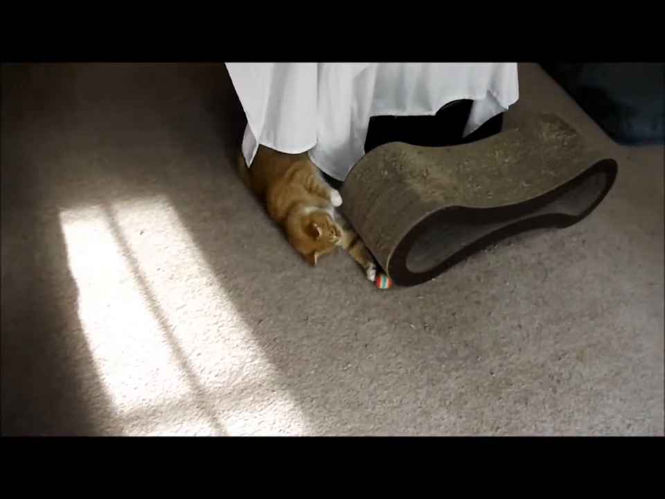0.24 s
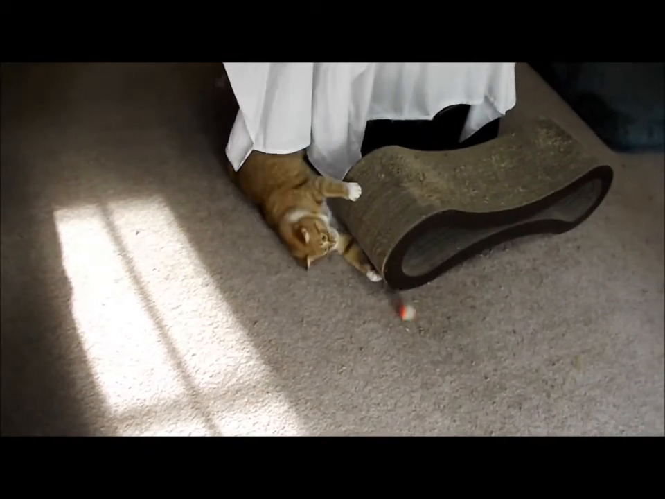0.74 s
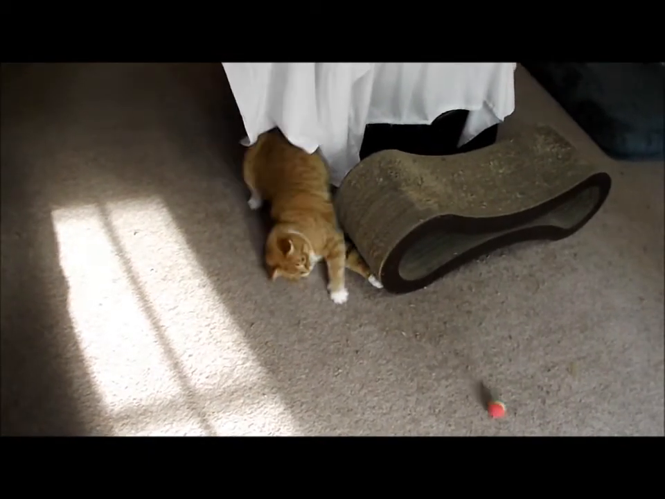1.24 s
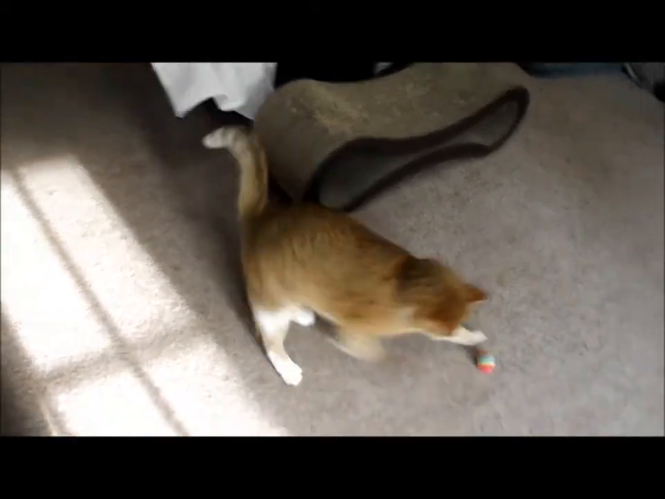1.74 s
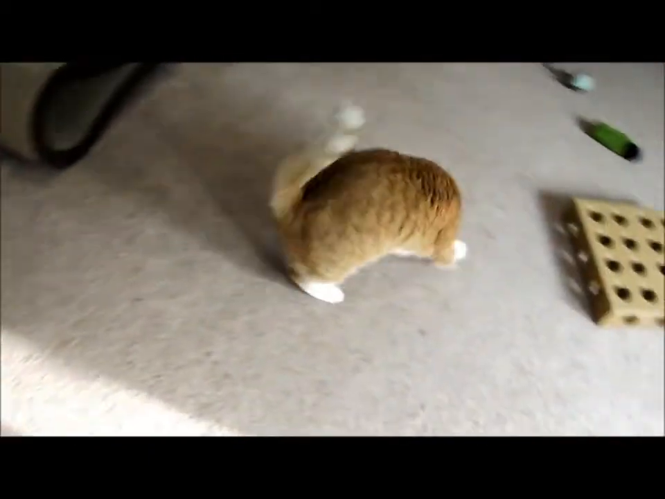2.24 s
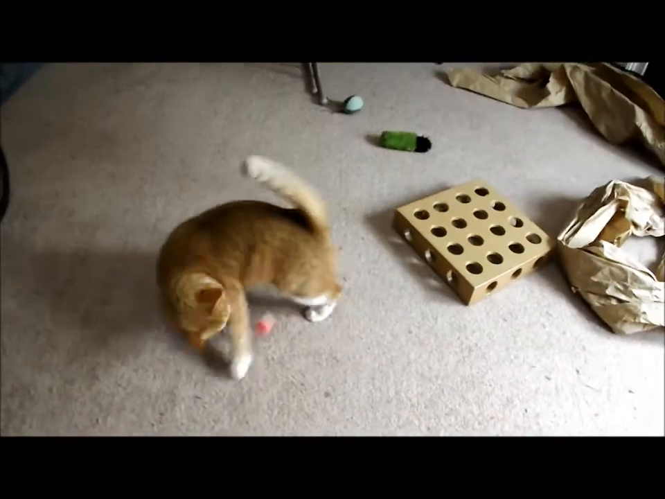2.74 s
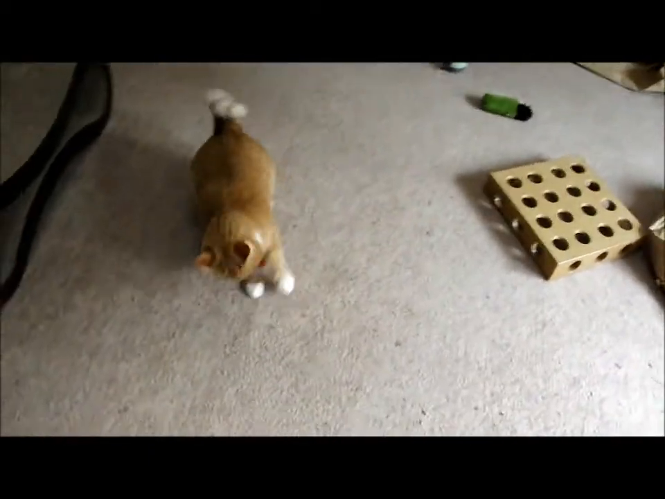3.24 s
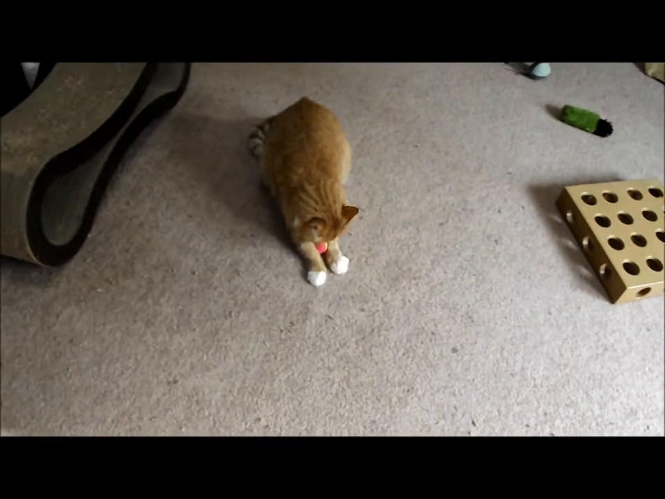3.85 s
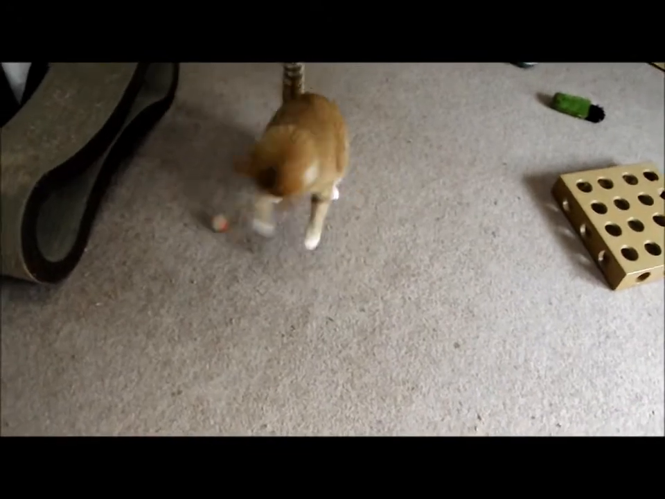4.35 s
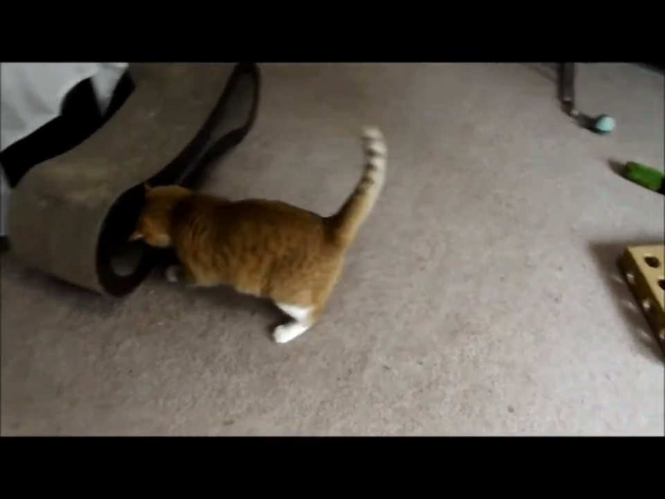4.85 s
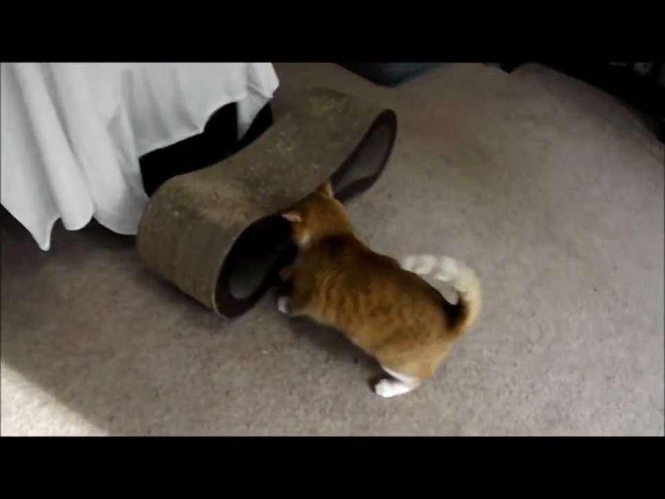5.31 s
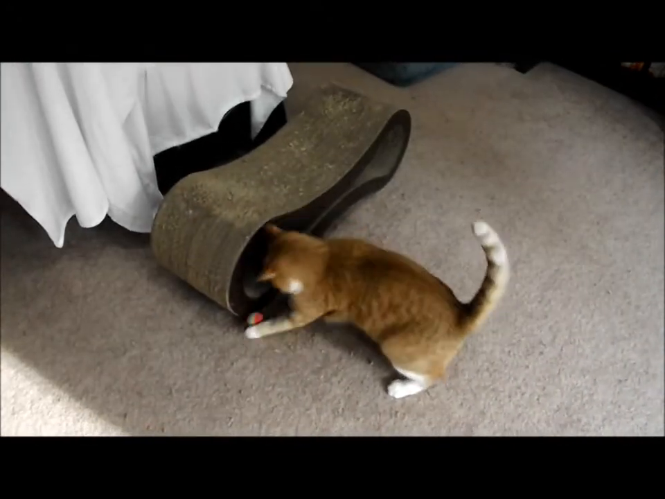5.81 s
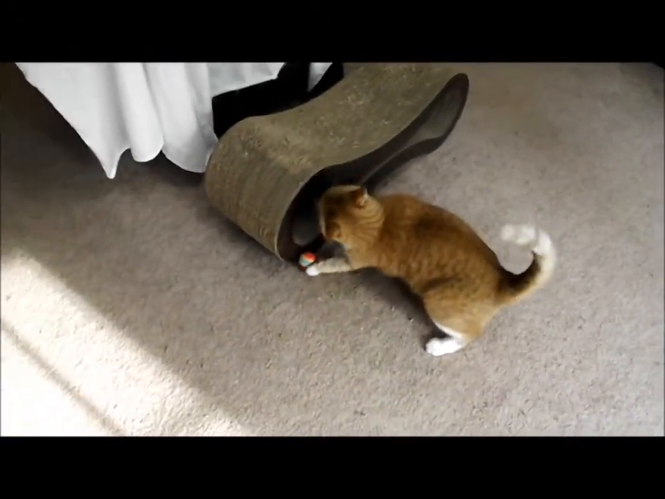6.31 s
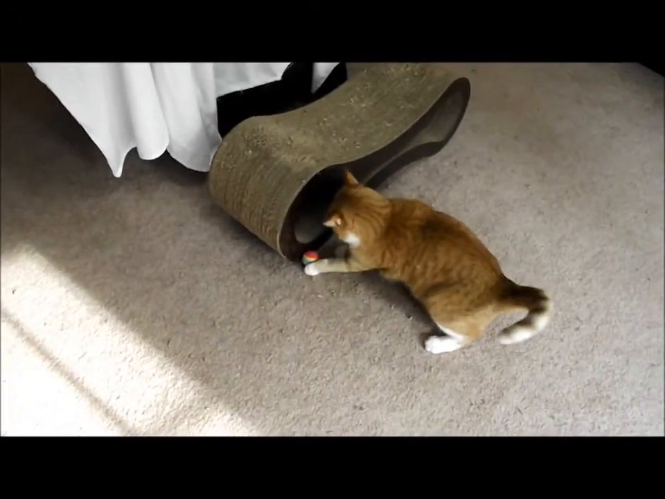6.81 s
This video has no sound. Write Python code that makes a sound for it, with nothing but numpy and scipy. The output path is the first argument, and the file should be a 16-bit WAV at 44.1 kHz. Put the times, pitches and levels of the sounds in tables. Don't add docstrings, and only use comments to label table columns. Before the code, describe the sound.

A quiet carpeted room holds a low drone, a faint motor and fan hum and soft airy noise throughout. From 0 to 0.7 s a small hard ball clicks lightly under a cat's paw. At 0.77 s comes the loudest sharp crack with a tight rattle, and at 1.22 s another bright click with chattering bounces. A firm paw thump at 1.45 s starts a scramble until about 3.2 s: dull quick footfalls, low floor rumble, rustling fur and pile, brief claw squeaks, and strong clicks near 2.7 and 2.95 s. It then calms; five short plastic creaks of the handheld camera shell come between 3.7 and 4.15 s. Hollow cardboard knocks follow at 4.45-4.7, 5.25 and, strongest with a sharp click, 5.7 s. A small rattle at 6.43 s and a boxy knock at 6.75 s close before the hum remains to 7 s.

```python
import sys
import numpy as np
from scipy import signal
from scipy.fft import rfft, irfft
from scipy.io import wavfile
from scipy.ndimage import uniform_filter1d

SR = 44100
rng = np.random.default_rng(int(sys.argv[2]) if len(sys.argv) > 2 else 0)


def ratio(d):
    e = np.asarray(d, float) / 20
    return 10 ** e


def digitize_waveform(pressure):
    field = np.atleast_2d(pressure).T
    bounded = np.clip(field, -1, 1)
    quanta = np.round(bounded * 32767).astype(np.int16)
    wavfile.write(sys.argv[1], SR, quanta)


N = 311787

# (frequency [Hz], density [dB per Hz])
AIR_SPECTRUM = [(76, -7), (130, -2), (166, -5), (285, -22), (386, -11), (613, -17), (1370, -8.5),
                (1550, -22.5), (2090, -11.5), (2410, -20), (3390, -9.5), (3910, -14.5), (5620, -23.5),
                (13600, -30), (15700, -45)]
AIR_DB = -47.5
# (frequency [Hz], width [Hz], level over noise [dB])
AIR_RESONANCES = [(385, 8, -8), (1145, 120, 4), (1416, 72, 10), (1700, 166, 12), (2128, 43, 9.5),
                  (2606, 270, 9), (3060, 50, 5), (3336, 45, 13), (3435, 130, 9), (3624, 114, 9),
                  (4310, 167, 13), (5000, 140, 5)]
# (frequency [Hz], t60 [s])
ROOM_T60 = [(150, 0.5), (400, 0.37), (1040, 0.25), (2760, 0.54), (7280, 0.41)]
# (frequency [Hz], density [dB per Hz])
PORT_HISS = [(500, -95), (2000, -87), (4000, 33), (8000, 12), (16000, 2.5)]
# (frequency [Hz], density [dB per Hz])
DRONE_SPECTRUM = [(2, -25), (5, 9), (20, 5), (38, 0), (52, 5.5), (66, -2.5), (74, -9), (82, -4.5),
                  (100, -20), (140, -45), (190, -41)]
DRONE_DB = -42.5
MOTOR_HZ, MOTOR_DB = 119.5, -54.5
# (time [s], level [dB])
FAN_LEVEL = [(0, -67.5), (1.3, -63), (3.3, -70.5), (4.9, -66.5), (5.4, -64), (7.07, -63)]
FAN_HZ = 382.5
# (time [s], rustle [dB], rumble [dB])
MOTION_LEVELS = [(0.0, -34.5, -47), (0.25, -51, -56.5), (0.69, -39.5, -54), (0.81, -36, -53),
                 (1.0, -42.5, -52), (1.45, -41, -50.5), (1.73, -40.5, -42.5), (1.931, -38, -41.5),
                 (2.5, -37.5, -47.5), (2.81, -40.5, -41), (2.97, -30.5, -36), (3.09, -53, -56.5),
                 (4.02, -48.5, -50.5), (4.3, -54, -54), (4.63, -45, -56), (5.08, -42, -57.5),
                 (5.6, -56, -57), (7.07, -48, -54)]
# (frequency [Hz], density [dB per Hz])
RUSTLE_SPECTRUM = [(290, -2.5), (500, -13), (990, -9), (1330, -9.5), (1730, -9), (2420, -7.5), (3020, 2),
                   (4220, -11), (5500, -21), (6780, -23.5), (14000, -41)]
# (frequency [Hz], density [dB per Hz])
RUMBLE_SPECTRUM = [(76, -35), (130, -34), (183, 10), (295, 5), (441, -1.5), (536, -3.5), (918, -8.5),
                   (1000, -3), (1300, -30), (2200, -120)]
# (frequency [Hz], density [dB per Hz])
SWAY_SPECTRUM = [(2, -16), (8, 52), (25, 10), (45, -42)]
SCUFF_DB, SCUFF_PEAK_S = -35.5, 0.032
# (time [s], peak [dB])
CRACKLES = [(0.4735, -46), (0.479, -47), (0.484, -48), (0.62, -49), (0.6255, -42), (0.637, -45),
            (1.852, -47), (2.6135, -40), (2.619, -44)]
# (time [s], peak [dB], pitch [Hz], rise [s])
PINGS = [(1.625, -41.5, 1125, .005), (1.842, -29.5, 1230, .006), (1.932, -38, 1166, 0.0047),
         (2.307, -39, 1140, 0.0053), (2.321, -40, 307, 0.0043), (2.465, -31.5, 247, 0.0058),
         (3.118, -47, 1140, 0.006), (3.208, -44, 1143, 0.0041), (3.893, -43, 630, 0.0037),
         (4.655, -37, 307, 0.015), (4.7, -46, 600, 0.0047), (4.8355, -31, 1177, .003),
         (5.258, -35.5, 304, .012), (5.725, -30, 306, 0.011), (6.754, -35, 610, 0.0054),
         (6.765, -36.5, 290, 0.011)]
PING_SAG = 0.072
# (time [s], peak [dB], squeak [Hz], length [s])
SKIDS = [(1.838, -29.5, 1220, 0.013), (1.852, -30, 1207, 0.035), (1.93, -36, 1150, 0.016),
         (2.019, -37, 1240, 0.018), (2.113, -32, 1220, 0.013), (2.289, -44, 1167, 0.028),
         (2.338, -38, 1166, 0.014), (2.894, -40, 1220, 0.013), (1.895, -39, 1195, 0.024),
         (0.792, -31, 3180, 0.093), (0.839, -41, 3850, 0.057), (1.225, -27, 3150, 0.023),
          (1.266, -40, 4660, 0.051), (1.685, -36, 2950, 0.026), (1.862, -31.5, 2505, 0.019),
          (2.444, -37.5, 2837, 0.042), (2.603, -44, 4450, 0.02), (2.63, -43, 4550, 0.031),
          (2.64, -49, 4700, 0.03), (2.657, -39, 4400, 0.022), (2.67, -45, 4320, 0.03),
          (2.099, -41, 3540, 0.029), (2.108, -40, 4520, 0.025), (1.713, -44.5, 5000, 0.022),
          (4.928, -47, 1900, 0.058), (6.878, -39, 3105, 0.054)]
# (time [s], peak [dB], length [s], upper modes [dB], main mode [dB])
CREAKS = [(3.713, -24, 0.015, -1, -2.5), (3.82, -23, 0.016, -1, 1.5), (3.911, -23, 0.016, 0, -4),
          (4.025, -21.5, 0.022, -1, -6), (4.125, -26, 0.017, 0, -3)]
# (frequency [Hz], level [dB], t60 [s])
SHELL_MODES = [(290, 0.5, 0.08), (525, -8, 0.026), (660, -7.5, 0.022), (857, -9.5, 0.12),
               (1080, 9.5, 0.041), (1254, -2.5, 0.068), (1437, -2, 0.04), (3020, -7.5, 0.046)]
# (time [s], peak [dB], upper modes [dB], room mode [dB], ring length [factor])
KNOCKS = [(4.454, -27, -22, 1, 0.32), (4.625, -38, -15, -8, 0.55), (4.65, -26, -14.5, -11, 0.82),
          (4.703, -41, -1.5, 12, 0.58), (5.247, -29.5, -8.5, -1, 0.74), (5.505, -36, -17, -2, 0.44),
          (5.713, -23, -4, 2.5, 0.72), (5.762, -29, -14, -8, 0.66), (5.811, -31.5, -12, -6, 0.73),
          (6.754, -32, -3.5, -2.5, 0.88), (6.81, -36, -11, 1, 0.66)]
# (frequency [Hz], level [dB], t60 [s])
CARDBOARD_MODES = [(223.2, 1, 0.53), (271.3, -4.5, 0.22), (301, 5, 0.13), (480, -1.5, 0.057),
                   (574, -4, 0.055), (671, -8, 0.062), (784, -7.5, 0.035), (1010, -2, 0.034)]
# (frequency [Hz], density [dB per Hz])
THUD_SPECTRUM = [(120, -30), (185, 17), (330, 9), (550, 3.5), (800, 0), (1300, -43)]
# (time [s], peak [dB], push [Hz], room share [dB], pad slap [dB])
PAWS = [(0.62, -53, 231, 13, 14), (0.766, -24.5, 587, 14.5, -1), (1.006, -30, 470, 5, -2),
        (1.215, -30, 390, 6, -7), (1.45, -18.5, 463, -1.5, -6), (1.4524, -23.5, 470, -10, -13),
        (1.461, -24, 480, -2, -17), (1.652, -30.5, 150, -15, -19), (1.686, -23, 225, -4, 2),
        (1.709, -34, 230, -10, -16), (1.797, -24.5, 224, -4, -24), (1.814, -36, 227, 2, -17),
        (1.969, -44, 368, 2, 12), (1.992, -33.5, 173, 3.5, -3), (2.0959, -21.5, 392, 1.5, -2),
        (2.116, -40, 430, -8, 8), (2.178, -29, 217, 4.5, -5), (2.192, -37, 250, 6, -19),
        (2.267, -38, 150, -5, -13), (2.32, -38.5, 247, -6, -16), (2.426, -25.5, 260, 0, -24),
        (2.466, -31.5, 230, 5.5, -22), (2.488, -38, 284, -3, -13), (2.557, -33.5, 190, 7, -22),
        (2.645, -25.5, 330, -3, 0), (2.693, -25.5, 296, -0.5, 6.5), (2.734, -29.5, 290, -8, -14),
        (2.827, -28.5, 253, 2, 0), (2.844, -27.5, 234, -5, -1), (2.925, -31, 189, -3, -13),
        (2.948, -27, 178, -0.5, 7), (2.961, -29, 244, -1.5, -1), (3.023, -32, 233, 4, -11),
        (3.162, -36, 290, -0.5, 0), (4.445, -31, 293, -4, -24), (4.612, -32, 200, -1, -23),
        (4.636, -33.5, 283, -7, -5), (4.731, -37, 202, -2, -22), (6.748, -30, 1010, 15, -1.5)]
# (time [s], peak [dB], ring [Hz], brightness [dB], softness [dB])
HITS = [(0.014, -25, 3350, -15, -9.5), (0.4614, -23.5, 4300, -9.5, -20), (0.6147, -15.5, 3430, -21.5, -8.5),
        (0.7674, -3.5, 2910, -17, -13.5), (0.7855, -18, 3130, -11.5, -12.5), (0.963, -24.5, 3080, -4, -8.5),
        (1.0056, -20.5, 3340, -15.5, -14.5), (1.1873, -26, 3050, -20, -4.5), (1.2235, -8, 3800, -20.5, -17),
        (1.232, -17.5, 3350, -11.5, -11.5), (1.4538, -17.5, 2600, -24, -1.5), (1.8532, -24, 2490, -35, -22),
        (2.0975, -23.5, 2860, -26, 2.5), (2.6012, -22.5, 4200, -8.5, -30), (2.6983, -9.5, 3190, -32, -1),
        (2.8155, -18, 3360, -43, -7), (2.9522, -14, 2800, -33, 1), (3.8973, -28, 2880, -32, 3),
        (4.6381, -22, 3320, -28, -18), (4.6989, -18, 3100, -25, -29), (5.698, -27.5, 4330, -17, -10),
        (5.711, -9, 3310, -33.5, -5), (6.4315, -17.5, 3230, -18.5, -6.5), (6.7516, -26, 2630, -31, 3.5)]
# (time [s], peak [dB], ring [Hz], room share [dB])
BOUNCES = [(0.0182, -16, 3230, 2.5), (0.464, -24.5, 3700, 4.5), (0.6166, -21, 3100, 9),
           (0.6243, -27, 3670, -8), (0.633, -32, 3280, 10), (0.77, -5.5, 4070, -4), (0.77, -14, 2860, 6),
           (0.773, -18, 2900, 9), (0.789, -8, 2770, -1), (0.792, -17, 2920, 6), (0.9654, -25, 3340, 6),
           (1.0084, -12.5, 3500, -1), (1.189, -30, 3550, 14), (1.2261, -6.5, 3150, -10),
           (1.2288, -16, 3300, 3), (1.2337, -14, 3500, 5), (1.2355, -11, 3260, -6), (1.239, -14, 3100, -1),
           (1.242, -14, 3020, -6), (1.2445, -18.5, 3640, 7), (1.4566, -18.5, 3230, 1),
           (2.1, -30.5, 3620, 7), (2.105, -36, 3300, 1), (2.1103, -28, 3500, 6), (2.114, -31, 2170, 5),
           (2.1194, -27, 2500, -5), (2.6021, -22.5, 3340, -3), (2.6133, -24, 4500, 6),
           (2.618, -30, 4670, 1), (2.7106, -20.5, 2800, -5), (2.715, -26, 2700, 0), (2.724, -26, 2950, -2),
           (2.8217, -18, 3070, 6), (2.8322, -14, 3080, -1), (2.963, -30, 3000, 5),
           (2.9688, -25.5, 3220, -14), (5.714, -13.5, 3350, -4), (5.7346, -20.5, 3080, -5),
           (6.433, -14, 3430, 2), (6.434, -14, 3350, 0), (6.437, -12.5, 2980, -4), (6.4396, -18, 3280, 2),
           (6.441, -21, 3060, -5)]
HIT_ROOM_DB, BOUNCE_BRIGHT_DB, BOUNCE_SOFT_DB = -0.5, -12.5, 1
# (time [s], peak [dB])
TAPS = [(0.025, -30), (0.6208, -27), (0.7832, -20), (0.805, -25), (0.833, -22), (0.984, -38), (1.0303, -35),
        (1.2073, -28.5), (1.2194, -20), (1.2204, -22), (1.2222, -17), (1.25, -24), (1.254, -29),
        (1.258, -34), (1.405, -35), (1.449, -24), (1.4654, -27), (1.701, -27), (1.88, -36), (1.97, -31),
        (2.0935, -36), (2.097, -33), (2.4519, -28.5), (2.4727, -29.5), (2.8245, -26), (2.825, -28),
        (2.8433, -25.5), (2.849, -33), (2.855, -33), (2.946, -22.5), (3.165, -32.5), (3.177, -32),
        (3.891, -35), (3.8921, -31.5), (3.8994, -36), (4.625, -39), (4.639, -33), (4.6855, -37),
        (4.7008, -29), (4.7031, -27.5), (5.247, -33), (5.7216, -21), (5.7704, -29), (6.451, -29),
        (6.455, -29), (6.4716, -29), (6.7534, -46)]
TAP_HZ, TAP_BRIGHT_DB, TAP_SOFT_DB, TAP_ROOM_DB = 3050, -29, -4.5, 8
# (frequency [Hz], density [dB per Hz])
SPIT_SPECTRUM = [(2500, -44), (4600, 4), (7200, -3), (10000, -8.5), (13000, -18), (16000, -40)]


def evened(x):
    return x / np.sqrt(np.mean(x ** 2) + 1e-20)


def drift(noise, width):
    return evened(uniform_filter1d(uniform_filter1d(noise, width), width))


def read(points, hz):
    f, value = np.transpose(points)
    return np.interp(np.log(hz + 1), np.log(f + 1), value)


def add(mix, s, sound):
    part = mix[max(round(s * SR), 0):][:len(sound)]
    part += sound[:len(part)]


def coloured(x, points):
    gain = ratio(read(points, np.fft.rfftfreq(len(x), 1 / SR)))
    return evened(irfft(rfft(x) * gain, len(x)))


def modes(table, seconds, spread, lag_s=0):
    t = np.arange(round(seconds * SR)) / SR
    hz, db, t60 = np.transpose(table)[:, :, None]
    luck = rng.standard_normal((2, len(table), 1))
    bent = t - lag_s * (hz < 350) * (1 - np.exp(-t / 0.0066))
    sines = np.sin(2 * np.pi * hz * (1 + spread * luck[1]) * bent + luck[0])
    return ratio(db + luck[0] - 60 * t / t60) * sines


def room(x, fade_s):
    taps = np.zeros(SR)
    at = np.arange(100, SR - 20, 20)
    taps[at + rng.integers(0, 20, len(at))] = rng.choice([-1., 1.], len(at))
    hz, t, z = signal.stft(taps, SR, nperseg=256)
    decay = ratio(-60 * t / read(ROOM_T60, hz)[:, None])
    tail = signal.istft(z * decay, SR, nperseg=256)[1]
    tail = tail * (1 - np.exp(-np.arange(len(tail)) / SR / fade_s))
    return signal.fftconvolve(x, tail / np.linalg.norm(tail))[:N]


def air():
    hz = np.fft.rfftfreq(N, 1 / SR)
    lift = 1 + sum(ratio(2 * db) / (1 + (2 * (hz - f) / width) ** 2) for f, width, db in AIR_RESONANCES)
    smooth = coloured(rng.standard_normal(N), AIR_SPECTRUM)
    noise = irfft(rfft(smooth) * np.sqrt(lift), N)
    z = signal.stft(noise, nperseg=1024)[2]
    patches = rng.standard_normal(z.shape[::-1]).T
    patches = evened(uniform_filter1d(uniform_filter1d(patches, 8, 0), 6, 1))
    return ratio(AIR_DB) * evened(signal.istft(z * ratio(1.32 * patches), nperseg=1024)[1][:N])


def hum():
    t = np.arange(N) / SR
    waver = drift(rng.standard_normal((4, N)), 3000)
    motor_phase = 2 * np.pi * np.cumsum(MOTOR_HZ + 0.9 * waver[1]) / SR
    motor = ratio(MOTOR_DB + 2.0 * waver[0]) * np.sin(motor_phase)
    fan_db = np.interp(t, *np.transpose(FAN_LEVEL)) + 2.0 * waver[2]
    fan_phase = 2 * np.pi * np.cumsum(FAN_HZ + 1.24 * waver[3]) / SR
    fan = ratio(fan_db) * np.sin(fan_phase)
    drone = ratio(DRONE_DB) * coloured(rng.standard_normal(N), DRONE_SPECTRUM)
    return drone + np.sqrt(2) * (motor + fan)


def grains(rate_hz, spread_db):
    strength = ratio(spread_db * rng.exponential(1, N).clip(0, 4))
    return strength * rng.standard_normal(N) * (rng.random(N) < rate_hz / SR)


def motion():
    s, rustle_db, rumble_db = np.transpose(MOTION_LEVELS)
    t = np.arange(N) / SR
    rustle_level = ratio(np.interp(t, s, rustle_db) - 9.0)
    u = t[:SR // 2] / SCUFF_PEAK_S
    for start, db, *_ in HITS:
        add(rustle_level, start, ratio(db + SCUFF_DB) * u * np.exp(1 - u))
    rustle = rustle_level * coloured(grains(3000, 1.7), RUSTLE_SPECTRUM)
    rumble = coloured(grains(900, 0.59), RUMBLE_SPECTRUM)
    sway = ratio(10.0) * coloured(rng.standard_normal(N), SWAY_SPECTRUM)
    return rustle + ratio(np.interp(t, s, rumble_db) - 7.0) * (rumble + sway)


def crackles():
    out, t = np.zeros(N), np.arange(300) / SR
    for s, db in CRACKLES:
        puff = coloured(rng.standard_normal(len(t)), SPIT_SPECTRUM)
        add(out, s - .001, ratio(db) * puff * (t / 0.00063) * np.exp(1 - t / 0.00076))
    return out


def pings():
    out = np.zeros(N)
    for s, db, hz, rise in PINGS:
        t = np.arange(round(9 * rise * SR)) / SR
        ring = np.sin(2 * np.pi * hz * t * (1 + PING_SAG * (.5 - 0.11 * t / rise)))
        add(out, s, ratio(db) * ring * (t / rise) ** 1.52 * np.exp(1.5 - 1.57 * t / rise))
    return out + ratio(-11.5) * room(out, .005)


def skids():
    out, t = np.zeros(N), np.arange(4000) / SR
    for s, db, hz, length in SKIDS:
        width = round(SR * 4.0 / hz * (1200 / hz) ** 0.62)
        wobble = evened(uniform_filter1d(rng.standard_normal((2, len(t))), width))
        phase = 2 * np.pi * hz * t
        squeak = (1400 / hz + wobble[0]) * np.cos(phase) + wobble[1] * np.sin(phase)
        swell = (3 * t / length) ** 1.74 * np.exp(1.6 - 3.95 * t / length)
        add(out, s, ratio(db - 11.0) * squeak * swell)
    return out + ratio(-11.5) * room(out, .01)


def creaks():
    out = np.zeros(N)
    for s, db, length, upper_db, main_db in CREAKS:
        rings = modes(SHELL_MODES, 0.063, 0.02, lag_s=0.002)
        t = np.arange(rings.shape[1]) / SR
        rise = length * (0.38 + 0.028 * rng.standard_normal((len(SHELL_MODES), 1))).clip(.1)
        rise[0], rise[1:3] = 0.5 * length, 0.11 * length
        grip = (1 - np.exp(-(t / rise) ** 2)) / (1 + (t / (1.53 * length)) ** 4)
        slips = drift(rng.standard_normal(rings.shape), 130)
        grip[1:] *= ratio(upper_db + 3.0 * slips[1:])
        grip[4] *= ratio(main_db)
        add(out, s - .003, ratio(db - 0.9) * (rings * grip).sum(0))
    return out


def knocks():
    out = np.zeros(N)
    for s, db, upper_db, low_db, length in KNOCKS:
        table = [(hz, level, t60 * length) for hz, level, t60 in CARDBOARD_MODES]
        rings = modes(table, 0.35, 0.014, lag_s=0.0019)
        t = np.arange(rings.shape[1]) / SR
        shake = rng.standard_normal(len(t))
        flutter = ratio(3.3 * drift(shake, 500))
        low = ratio(low_db) * rings[0] * (1 - np.exp(-t / 0.062))
        middle = flutter * rings[1:3].sum(0) * (1 - np.exp(-t / 0.01))
        upper = ratio(upper_db + 9.0) * rings[3:].sum(0)
        thud = coloured(shake, THUD_SPECTRUM) * ratio(upper_db + 1.0 - 60 * t / (0.25 * length))
        onset = 1 - np.exp(-t / 0.00066)
        add(out, s, ratio(db - 6.0) * (low + middle + upper + thud) * onset)
    return out + ratio(-2.0) * room(out, 0.0071)


def paws():
    direct, sent, t = np.zeros(N), np.zeros(N), np.arange(1200) / SR
    for s, db, hz, room_db, pad_db in PAWS:
        pad = ratio(pad_db) * np.sin(2 * np.pi * 650 * t) * np.exp(-t / 0.00081)
        cycle = np.sin(2 * np.pi * hz * t) * np.exp(-1.5 * hz * t)
        push = -(cycle - pad) * (1 - np.exp(-t / 0.00052))
        add(direct, s + 0.00434, ratio(db + 7.0) * push)
        add(sent, s + 0.00421, ratio(db + room_db) * push)
    boards = signal.butter(1, [230, 520], "bandpass", fs=SR, output="sos")
    return direct + ratio(7.0) * room(signal.sosfilt(boards, sent), 0.00096)


def click(db, hz, bright_db, soft_db):
    t = np.arange(300) / SR
    phase_luck, beside_luck, tick_luck = rng.standard_normal(3)
    ring = np.sin(2 * np.pi * hz * t + phase_luck)
    ring *= (t / 0.00039) ** 1.85 * np.exp(1.2 - 1.436 * t / 0.00041)
    beside = 0.15 * np.sin(2 * np.pi * (4400 + 150 * beside_luck) * t)
    beside *= (t / 0.00068) * np.exp(1 - t / 0.00062)
    spit = 1.13 * coloured(rng.standard_normal(len(t)), SPIT_SPECTRUM) + 0.5 * np.sin(2 * np.pi * 7300 * t)
    spit *= (t / 0.00047) * np.exp(1 - t / 0.0005)
    tick = np.sin(2 * np.pi * (1680 + 80 * tick_luck) * t)
    tick *= (t / 0.00061) ** 2 * np.exp(2 - 2 * t / 0.00051)
    return ratio(db + 1.5) * (ring + beside + ratio(bright_db) * spit + ratio(soft_db) * tick)


def clicks():
    out, sent = np.zeros(N), np.zeros(N)
    rows = [(*hit, HIT_ROOM_DB) for hit in HITS]
    for s, db, hz, room_db in BOUNCES:
        *_, bright_db, soft_db = [hit for hit in HITS if hit[0] < s][-1]
        rows.append((s, db, hz, bright_db + BOUNCE_BRIGHT_DB, soft_db + BOUNCE_SOFT_DB, room_db))
    rows += [(s, db, TAP_HZ, TAP_BRIGHT_DB, TAP_SOFT_DB, TAP_ROOM_DB) for s, db in TAPS]
    for s, *row, room_db in rows:
        sound = click(*row)
        add(out, s - .0005, sound)
        add(sent, s - .0005, ratio(room_db) * sound)
    t = np.arange(900) / SR
    scatter = rng.standard_normal(len(t)) * (rng.random(len(t)) < .08)
    scatter *= ratio(-60 * t / 0.028) * (t > .0008)
    near = signal.oaconvolve(sent, scatter / np.linalg.norm(scatter))[:N]
    light = signal.butter(2, 900, "highpass", fs=SR, output="sos")
    return signal.sosfilt(light, out + ratio(-8.0) * near + ratio(-9.0) * room(sent, 0.0024))


def scene():
    background = air() + hum() + motion()
    friction = crackles() + pings() + skids() + creaks()
    field = background + friction + knocks() + paws() + clicks()
    return np.array([field, field])


def roll_off(x):
    return signal.sosfilt(signal.butter(12, 16480, fs=SR, output="sos"), x)


def record(dry):
    ports = np.array([np.roll(dry[0], shift=1), dry[1]])
    hiss = np.array([coloured(rng.standard_normal(N), PORT_HISS) for port in ports])
    clipped = np.clip(ports + ratio(-70.5) * hiss, -.93, .93)
    band_limit = signal.cheby2(24, 60, 16200, fs=SR, output="sos")
    return roll_off(signal.sosfilt(band_limit, clipped))


dry = scene()
out = record(dry)
digitize_waveform(out)
```